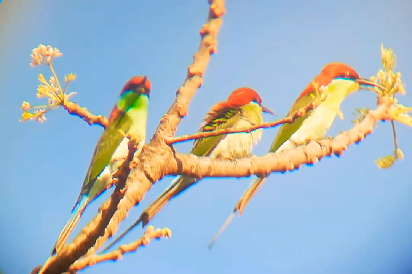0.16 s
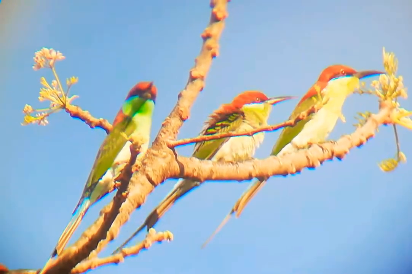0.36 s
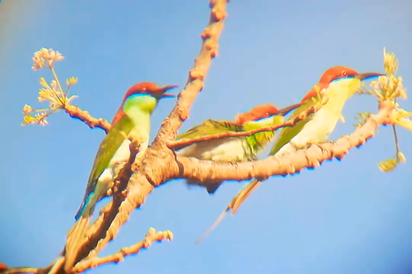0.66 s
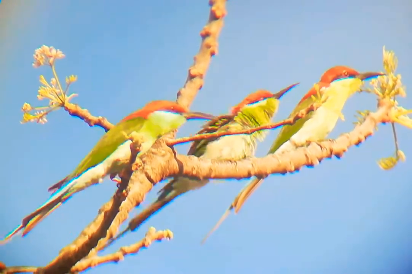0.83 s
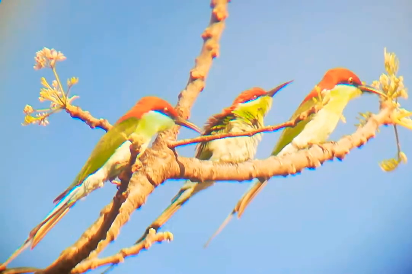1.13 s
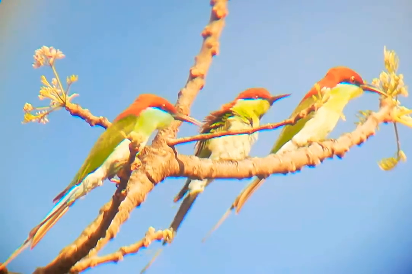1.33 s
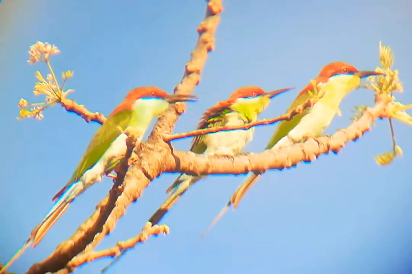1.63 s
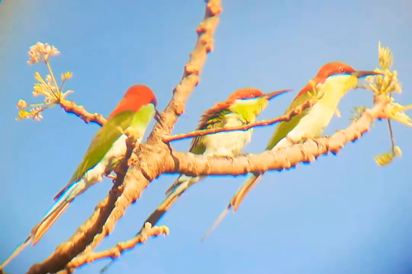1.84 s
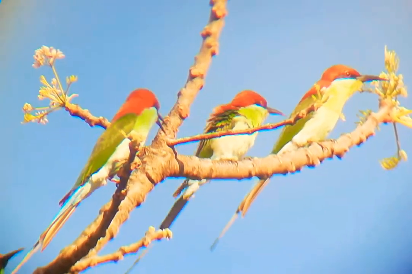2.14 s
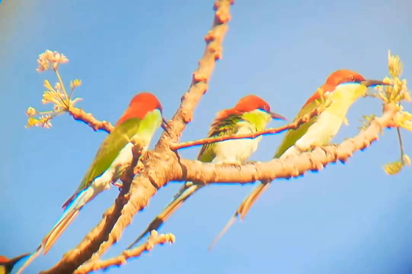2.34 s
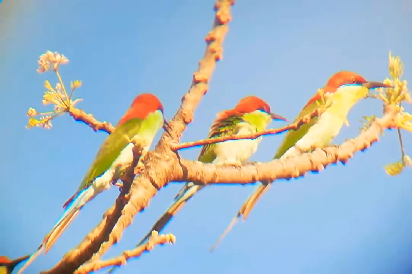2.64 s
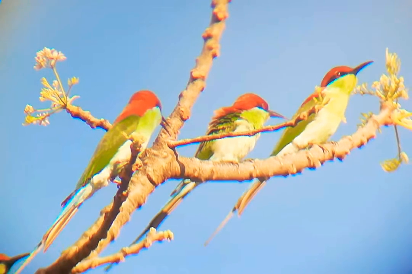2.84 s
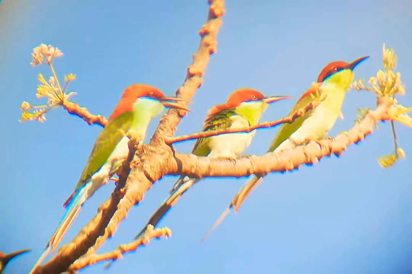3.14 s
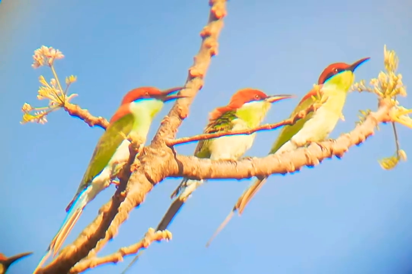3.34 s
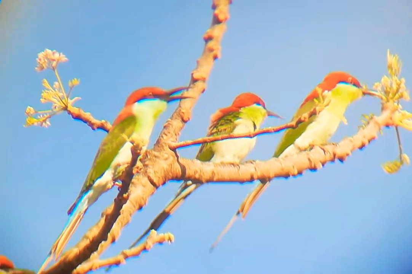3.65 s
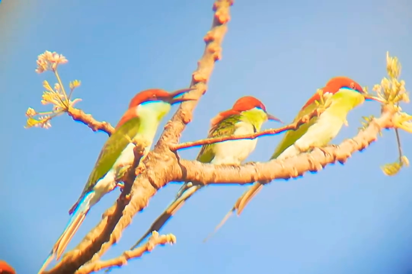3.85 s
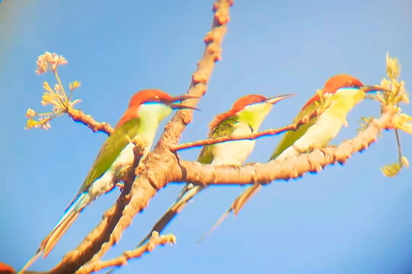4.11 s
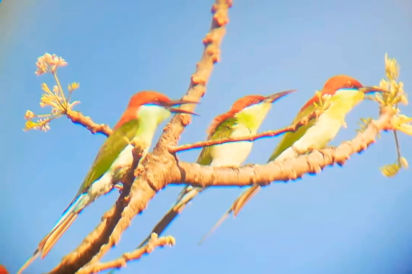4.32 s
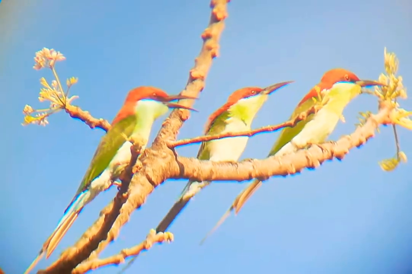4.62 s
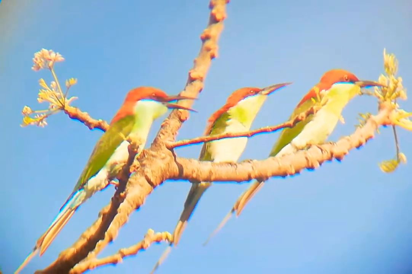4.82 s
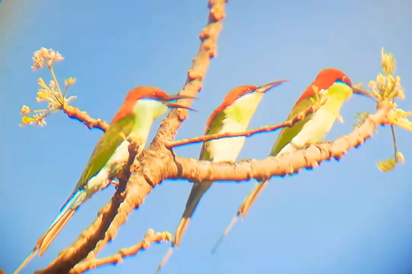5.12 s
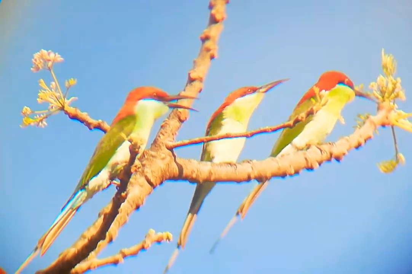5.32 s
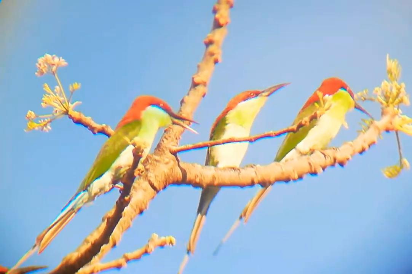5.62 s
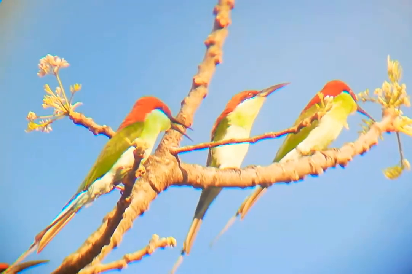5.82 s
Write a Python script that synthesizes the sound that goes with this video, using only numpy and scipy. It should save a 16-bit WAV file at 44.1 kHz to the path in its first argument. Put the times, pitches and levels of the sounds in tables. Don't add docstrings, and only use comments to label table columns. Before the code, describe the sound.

Several bee-eaters perched close by give short, rolled, liquid whistles that rise and fall quickly. Calls are spaced out at first, with small gaps, then thicken after three seconds into almost continuous overlapping chatter, loudest at the end. Wind thumps low on the stereo microphones in uneven gusts, strongest late. Open air, only slight echo from twigs and ground, with a very faint airy hiss.

```python
import sys
import numpy as np
from scipy import signal
from scipy.io import wavfile
from scipy.ndimage import uniform_filter1d

SR = 44100
rng = np.random.default_rng(int(sys.argv[2]) if len(sys.argv) > 2 else 0)


def attenuation_scalar(level_db):
    decades = np.asarray(level_db, float) / 20
    return 10 ** decades


def file_out(sig):
    cols = np.atleast_2d(sig).T
    lim = np.clip(cols, -1, 1)
    pcm = np.round(lim * 32767).astype(np.int16)
    wavfile.write(sys.argv[1], SR, pcm)


N = 263277

OVERTONES = [2.5, -23.5, -37.5, -51.5]


def evened(x):
    return x / np.sqrt(np.mean(x ** 2) + 1e-20)


def add(mix, s, sound):
    part = mix[round(s * SR):][:len(sound)]
    part += sound[:len(part)]


def drift(count, smooth):
    x = rng.standard_normal(count)
    for _ in range(4):
        x = uniform_filter1d(x, int(smooth))
    return evened(x)


def excerpt(wander, start, count):
    return np.resize(wander[round(start):], count)


def noise(spectrum, same_hz, patchy_db):
    hz = np.fft.rfftfreq(1024, 1 / SR)
    a, b, c, d, patches = rng.standard_normal((N // 256 + 5, 513, 5)).T
    patches = uniform_filter1d(patches, 10, 0)
    patches = evened(uniform_filter1d(patches, 10, 1))
    same = 1 / (1 + (hz[:, None] / same_hz) ** 2)
    left = a + 1j * b
    right = same * left + np.sqrt(1 - same ** 2) * (c + 1j * d)
    f, db = np.transpose(spectrum)
    spectrum_db = np.interp(np.log(hz + 1), np.log(f + 1), db)[:, None]
    z = np.array([left, right]) * attenuation_scalar(spectrum_db + patchy_db * patches)
    return evened(signal.istft(z, nperseg=1024, noverlap=768)[1][:, :N])


def tone(hz, partials_db):
    turns = np.cumsum(hz) / SR + rng.random()
    partials = [np.sqrt(2) * attenuation_scalar(db) * np.sin(2 * np.pi * k * turns) for k, db in enumerate(partials_db, 1)]
    return sum(partials)


def echo(x, t60, gap):
    taps = np.zeros((2, SR // 2))
    at = np.arange(0, SR // 2, 50) + rng.integers(0, 50, (2, SR // 100))
    np.put_along_axis(taps, at, rng.choice([-1., 1.], at.shape), 1)
    t = np.arange(SR // 2) / SR
    taps *= attenuation_scalar(-60 * t / t60) * (t > gap)
    return signal.fftconvolve(x[None], taps / np.linalg.norm(taps[0]), axes=1)[:, :N]


def placed(x, pan_db, lag):
    return attenuation_scalar([[pan_db / 2], [-pan_db / 2]]) * np.array([x, np.roll(x, round(lag))])


def glides(notes, flutter, rasp_db, partials_db):
    lap = .005
    out, shake, grit = np.zeros(N), drift(N, smooth=100), drift(N, smooth=32)
    for s, ms, start_hz, end_hz, db in notes:
        t = np.arange(-lap, ms / 1000 + lap, 1 / SR)
        chance, rasp = excerpt(shake, s * SR, len(t)), excerpt(grit, s * SR, len(t))
        hz = start_hz + (end_hz - start_hz) * t * 1000 / ms + 25 * chance
        pipe = 1 / (1 + ((hz - 2800) / 700) ** 2)
        height = np.clip((hz - 2950) / 400, 0, 1)
        beat = np.sin(2 * np.pi * (62 * t + rng.random()))
        shape = evened(pipe * (1 + flutter * height * beat) * attenuation_scalar(1.7 * chance[::-1]))
        voice = shape * (1 + attenuation_scalar(rasp_db) * rasp) * tone(hz, partials_db)
        low = flutter * height * np.maximum(-beat, 0) ** 2 * tone(2230 + 60 * chance, [-3])
        fade = signal.windows.tukey(len(t), min(4 * lap / np.ptp(t), 1))
        add(out, max(s - lap, 0), attenuation_scalar(db) * (voice + low) * fade)
    return out


def call_pitch(ms, rise, fall, top_hz, foot_hz, spiky, early):
    hump_hz, end_hz, pipe_hz = 3108, 2180, 2850
    spike = spiky * (top_hz - hump_hz)
    round_top = top_hz - spike
    up = 1 - np.clip(-ms / rise, 0, 1) ** 1.2
    down = 1 - np.clip(ms / fall, 0, 1) ** (1 + .9 * (1 - spiky))
    rising = foot_hz + (round_top - foot_hz) * up
    falling = end_hz + (round_top - end_hz) * down
    hz = np.where(ms < 0, rising, falling) + spike * np.exp(-abs(ms) / 11.33)
    hz = hz + 150 * np.sin(2.39 * early)
    hz = hz - .55 * (hz - pipe_hz) * np.exp(-((hz - pipe_hz) / 280) ** 2)
    return uniform_filter1d(hz, size=220)


def calls(rows, breaks_ms, foot_hz, spiky, rasp_db):
    lead_ms, flip_ms, edge_ms = 41, 3.8, 11.3
    out, shake, grit = np.zeros(N), drift(N, smooth=100), drift(N, smooth=32)
    lumps, rolled = drift(N, smooth=140), len(breaks_ms) > 0
    for s, rise, fall, top_hz, db in rows:
        ms = np.arange(-rise - lead_ms * rolled, fall, 1000 / SR)
        chance, rasp, lump = (excerpt(v, s * SR / 2, len(ms)) for v in (shake, grit, lumps))
        early = np.clip(-(ms + rise) / lead_ms, 0, 1)
        hz = call_pitch(ms, rise, fall, top_hz, foot_hz, spiky, early) + 25 * chance

        pipe = (1 + ((hz - 2850) / 580) ** 2) ** -0.85
        swell_db = -8 * np.clip(-ms / rise, 0, 1) ** 2
        lead_db = -4.5 * np.minimum(5 * early, 1)
        shape = attenuation_scalar(1.2 * chance[::-1] + 2.67 * lump + swell_db + lead_db) * pipe

        since_flips = [ms + rise - after for after in breaks_ms]
        broken, low = np.zeros(len(ms)), np.zeros(len(ms))
        for u in since_flips:
            flip = np.exp(-(u / flip_ms) ** 2)
            broken += flip
            low += flip * tone(foot_hz - 145.4 + 40 * chance + 14 * u, [-2.5])
        crest = .9 * (1 - rolled) * np.exp(-((ms + 5) / 3) ** 2)
        falter = (1 - np.clip(1.2 * broken, 0, 1)) * (1 - crest)

        voice = 1.33 * shape * falter * (1 + attenuation_scalar(rasp_db) * rasp) * tone(hz, OVERTONES)
        fade = signal.windows.tukey(len(ms), min(2 * edge_ms / np.ptp(ms), 1))
        add(out, max(s + ms[0] / 1000, 0), attenuation_scalar(db) * (voice + low) * fade)
    return out


def flock():
    # time of crest in seconds, rise in ms, fall in ms, crest pitch in Hz, level in dB.
    rolls_near = [(2.195, 42, 33.7, 3490, -43.5), (4.167, 40.6, 44, 3400, -46.5),
                  (4.547, 45.4, 46, 3340, -40), (4.981, 48, 55, 3244, -41), (5.306, 44, 53.4, 3220, -41),
                  (5.629, 47, 66, 3200, -40.5)]
    rolls_side = [(1.011, 38, 53.4, 3530, -47.5), (1.263, 35.4, 58.4, 3640, -46.5),
                  (3.107, 31, 79.3, 3860, -43), (3.47, 28, 80.1, 3800, -40.5), (3.968, 42, 50, 3740, -46)]
    rolls_deep = [
        (2.024, 41.7, 51.7, 3216, -52.5),
        (2.305, 50.1, 51.9, 3136, -46.5),
        (2.783, 32.8, 48.1, 3520, -46.5),
    ]
    domes = [(.557, 23.3, 42, 3480, -39), (2.553, 40, 40, 3247, -45), (3.86, 42.4, 74, 3330, -42),
             (4.347, 44, 69, 3300, -41.5), (5.168, 30, 57, 3180, -40), (5.42, 34, 71, 3096, -40.5),
             (5.69, 45, 68, 3153, -41.5), (5.945, 30, 70, 3120, -36.5)]
    arches_ahead = [
        (.497, 49.3, 60, 3376, -48),
        (1.165, 60, 40, 3480, -49.5),
        (1.53, 48.5, 42, 3320, -46.5),
    ]
    peaks_ahead = [(.196, 38, 61.6, 3495, -45.5), (3.532, 26, 69.7, 3444, -47),
                   (4.638, 44.3, 28, 3490, -43), (4.699, 44.5, 64.3, 3464, -47.5),
                   (5.209, 45.1, 60, 3625, -41.5)]
    arches_left = [(.022, 14, 55, 3280, -58), (.298, 30, 13, 3400, -50), (.598, 28.4, 48, 3477, -52.5),
                   (1.325, 40, 55, 3435, -50.5), (2.15, 65, 25, 3510, -59.5),
                   (4.387, 45, 50.6, 3570, -45.5), (5.44, 35, 71, 3520, -53)]
    arches_right = [(1.108, 32.3, 47.9, 3334, -49), (1.571, 33.56, 38.2, 3256, -50.5),
                    (2.25, 45.6, 35.19, 3680, -50), (3.278, 55.3, 42.4, 3270, -56.5)]
    arches_behind = [(1.64, 30, 52.2, 3500, -53.5), (4.437, 38, 29, 3450, -52), (4.742, 13, 36, 3350, -51),
                     (5.128, 41, 29.8, 3500, -49.5)]
    # start in seconds, length in ms, start pitch in Hz, end pitch in Hz, level in dB.
    chips = [(.117, 17, 2750, 2660, -60.5), (.305, 12.2, 2560, 3340, -49.5), (.318, 16.5, 2450, 2280, -54),
             (.851, 15.3, 2520, 3140, -46), (.865, 2.5, 3590, 3730, -41), (.866, 17.4, 2390, 2090, -47),
             (1.4, 37, 2750, 2610, -61.5), (1.455, 29, 2540, 2280, -62), (2.472, 30, 2370, 2550, -56),
             (2.854, 14.3, 2560, 3470, -61), (2.868, 6.3, 2500, 2420, -62),
             (4.625, 32.7, 2480, 2384, -48.5), (4.687, 7.6, 2195, 2300, -44), (4.478, 18, 3250, 3770, -59),
             (5.95, 13, 2340, 2460, -42), (5.42, 16, 2416, 2500, -44.5), (.004, 8.5, 3130, 3150, -58),
             (5.036, 32, 2820, 3650, -49.5), (5.055, 22, 2700, 2670, -57), (5.105, 35, 2340, 2430, -54)]
    squabble = [(3.44, 150, 2896, 2863, -57.5), (.215, 22, 2300, 2240, -66), (.47, 41, 2400, 2330, -60.5),
                (1.03, 110, 2260, 2320, -59.5), (1.253, 89, 2400, 2296, -59.5),
                (2.23, 35, 2390, 2500, -56.5), (3.458, 53, 2400, 2390, -59), (3.5, 46, 2250, 2400, -65),
                (3.51, 32, 3500, 3300, -58), (3.88, 30, 2350, 2260, -60), (4.33, 77, 2180, 2133, -63),
                (5.627, 29.4, 2530, 2466, -46)]
    perch_pans = [
        3.5,
        3.5,
        -3.5,
        3.5,
        2.5,
        8,
        1,
        -8.5,
        -5,
    ]
    perch_lags = [4, 5, -1, 6, 1, 6, -2, 6, 1]

    ahead = calls(arches_ahead, (), 2400, 0.296, -13.5) + calls(peaks_ahead, (), 2420, .85, -15)
    odd = glides(chips, 0.67, -17.5, OVERTONES) + glides(squabble, 0.71, -3.0, OVERTONES)
    voices = [calls(rolls_near, (20, 39), 2440, 0.26, -16.5),
              calls(rolls_side, (26, 44), 2370, 0.58, -11.5),
              calls(rolls_deep, (27, 43), 2270, 0.93, -13),
              calls(domes, (24, 41), 2420, 0.049, -11.5),
              ahead,
              calls(arches_left, (), 2420, .6, -8),
              calls(arches_right, (), 2700, 0.27, -10.5),
              calls(arches_behind, (), 2450, .9, -4),
              odd]
    direct = sum(placed(*perch) for perch in zip(voices, perch_pans, perch_lags))
    hiss = attenuation_scalar(-34) * uniform_filter1d(abs(direct), 300) * rng.standard_normal((2, N))
    twigs = attenuation_scalar(-11) * echo(sum(voices), .1, .002)
    ground = attenuation_scalar(-16) * echo(sum(voices), .35, .02)
    return direct + hiss + twigs + ground


def wind():
    # time in seconds, rumble level in dB.
    gusts = [(0, -38.5), (.45, -45.5), (.6, -35.5), (.75, -48), (1.2, -46), (1.4, -38), (1.65, -37),
             (1.8, -57), (2.3, -46.5), (2.9, -54), (3.3, -46), (3.7, -50.5), (4.3, -46), (4.65, -31.5),
             (5.25, -33.5), (5.4, -41.5), (5.65, -33.5), (5.97, -43)]
    # frequency in Hz, level in dB.
    rumble_spectrum = [(10, -16), (40, 3.5), (75, -2.5), (137, -23), (217, -40), (600, -69.5)]
    air_spectrum = [(60, -10), (200, -19.5), (450, -41.5), (1100, -40.5), (2000, -32.5), (2800, -33),
                    (3500, -40.5), (4200, -44), (6500, -47), (9200, -42), (10000, -54), (15600, -57)]
    s, db = np.transpose(gusts)
    gust_db = np.interp(np.arange(N) / SR, s, db)
    rumble = attenuation_scalar(gust_db + 2.0 * drift(N, smooth=2100)) * noise(rumble_spectrum, 250, patchy_db=2.5)
    airy_floor = attenuation_scalar(-55 + 0.24 * (gust_db + 43)) * noise(air_spectrum, 340, patchy_db=2.0)
    return rumble + airy_floor


def insects():
    # pitch in Hz, chirps per second, level in dB.
    singers = [
        (8680, 27, -84),
        (9080, 13, -86),
    ]
    t, out = np.arange(N) / SR, 0
    for hz, rate, db in singers:
        stroke = np.sin(2 * np.pi * (rate * t + 0.05 * drift(N, smooth=4800)))
        chirps = np.maximum(stroke, 0) ** 0.5
        swell = attenuation_scalar(db + 3.1 * drift(N, smooth=1300))
        out = out + swell * chirps * tone(hz + 40 * drift(N, smooth=1500), [0])
    return placed(out, -19.0, 9.9)


def piping():
    # start in seconds, length in ms, start pitch in Hz, end pitch in Hz, level in dB.
    pipes = [(0, 25, 5480, 5510, -63), (.08, 10, 4500, 5650, -54), (.086, 23, 5520, 5350, -56.5),
             (.212, 6.4, 4550, 5740, -59), (.217, 7.8, 5500, 5380, -55), (.25, 31, 5400, 5550, -78),
             (2.46, 20, 6850, 7200, -74), (2.51, 16, 7450, 7800, -67.5), (4.47, 29, 5260, 5200, -64)]
    return glides(pipes, 0, -13.5, [0])


def rustles():
    # start in seconds, decay by 60 dB in ms, level in dB.
    puffs = [
        (.082, 120, -80),
        (0.214, 250, -73),
        (2.89, 12, -77),
    ]
    out, ms = np.zeros(N), np.arange(4000) / SR * 1000
    for s, t60_ms, db in puffs:
        bright = np.diff(rng.standard_normal(4001))
        add(out, s, attenuation_scalar(db - 60 * ms / t60_ms) * bright)
    return placed(out, -19.0, 3)


def dove():
    # start in seconds, length in ms, level in dB.
    coos = [(1.63, 45, -87), (1.816, 45, -74), (2.029, 25, -75), (2.169, 66, -72), (2.631, 49, -76),
            (2.767, 45, -72), (2.898, 64, -78), (3.076, 104, -67.5), (3.319, 90, -72), (3.701, 53, -77.5),
            (3.851, 45, -68), (3.977, 23, -70.5), (4.089, 30, -75), (4.269, 91, -77)]
    out = np.zeros(N)
    for s, ms, db in coos:
        t = np.arange(0, ms / 1000, 1 / SR)
        hz = 1150 * (1 - 0.267 * np.exp(-t / 0.0139))
        add(out, s, attenuation_scalar(db) * tone(hz, [0]) * signal.windows.tukey(len(t), .6))
    return out


def arch():
    # time in seconds, pitch in Hz, level in dB.
    bends = [(2.362, 1380, -71), (2.44, 1730, -82), (2.55, 2006, -77), (2.659, 2180, -80.5),
             (2.718, 2172, -78), (2.782, 1810, -70)]
    whistle_partials = [-22, -2, 0, -25, -10]
    s, hz, db = np.transpose(bends)
    t, out = np.arange(s[0], s[-1], 1 / SR), np.zeros(N)
    loudness = attenuation_scalar(np.interp(t, s, db) + 4.0 * drift(len(t), smooth=580))
    add(out, s[0], loudness * tone(np.interp(t, s, hz), whistle_partials))
    return out


def crow():
    count, out = round(.36 * SR), np.zeros(N)
    rasp = tone(1500 + 70 * drift(count, smooth=89), [0]) * attenuation_scalar(2.8 * drift(count, smooth=110))
    add(out, 5.16, attenuation_scalar(-66.5) * rasp * signal.windows.tukey(count, .3))
    return out


def scene():
    far = piping() + dove() + arch() + crow()
    distant = placed(far, -3.3, 7.16) + attenuation_scalar(-1) * echo(far, 0.44, .01)
    return flock() + distant + insects() + rustles() + wind()


def roll_off(x):
    return signal.sosfilt(signal.butter(12, 15650, fs=SR, output="sos"), x)


def record(dry):
    edge = signal.firwin(511, 15600, window=("kaiser", 9), fs=SR)
    mix = signal.oaconvolve(dry, edge[None], "same")
    return roll_off(mix)


dry = scene()
out = record(dry)
file_out(out)
```